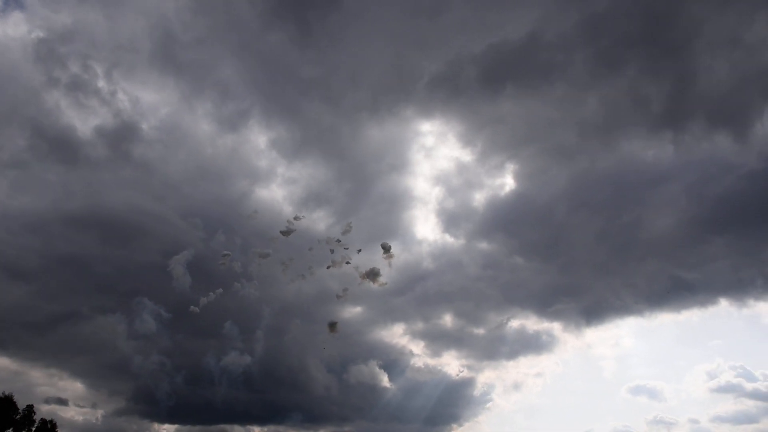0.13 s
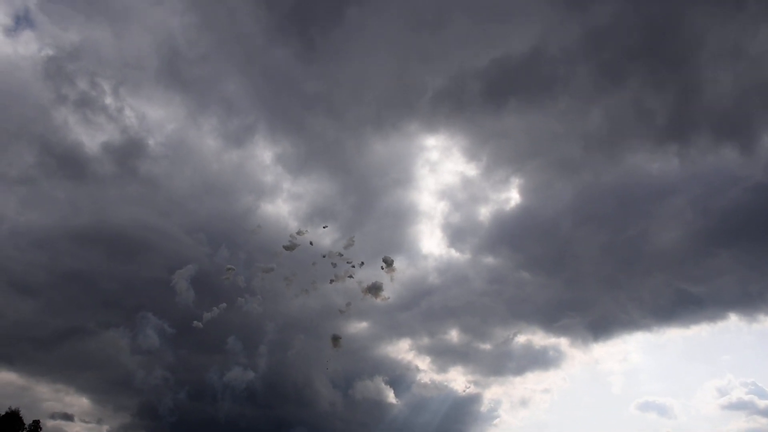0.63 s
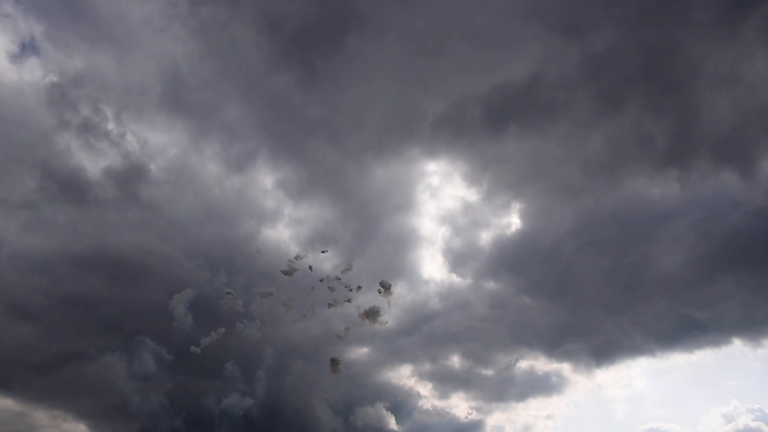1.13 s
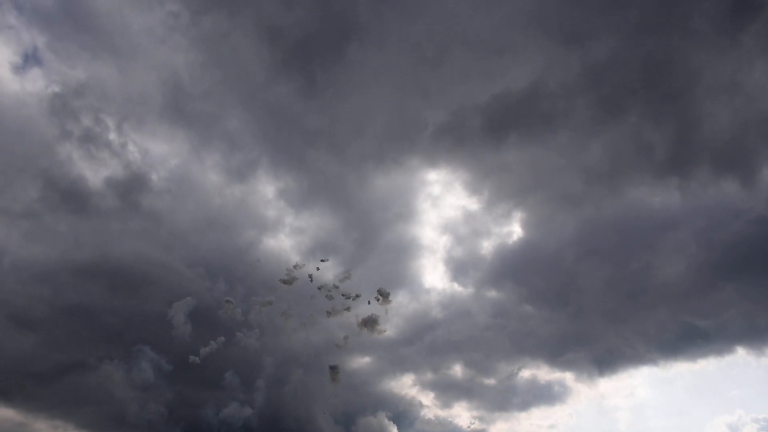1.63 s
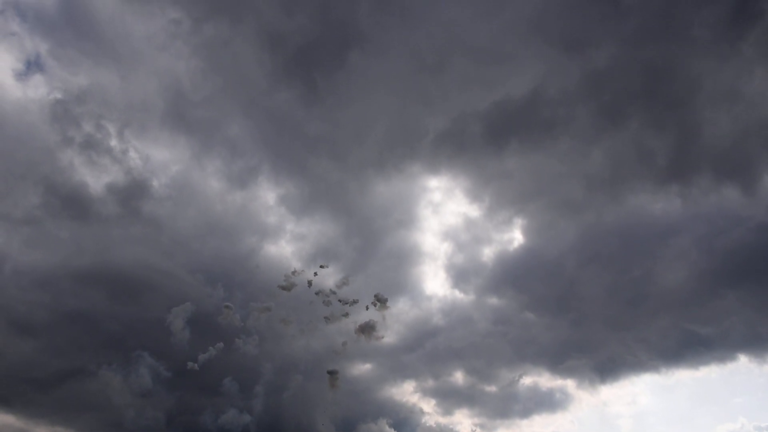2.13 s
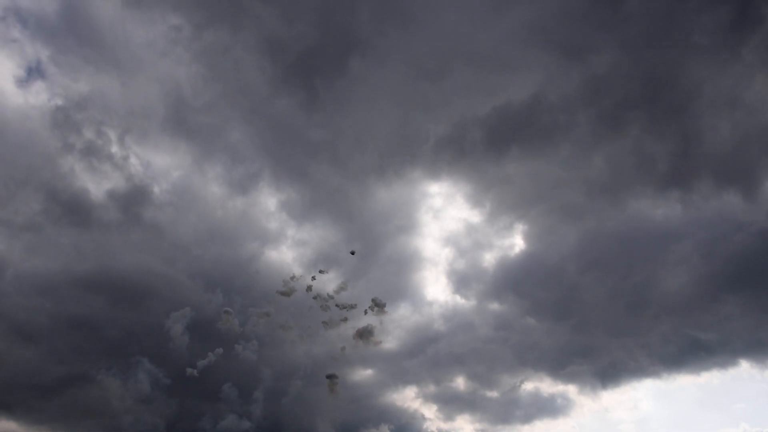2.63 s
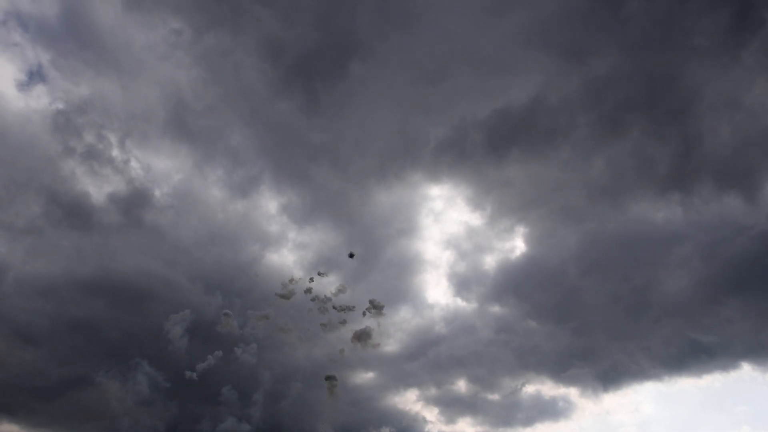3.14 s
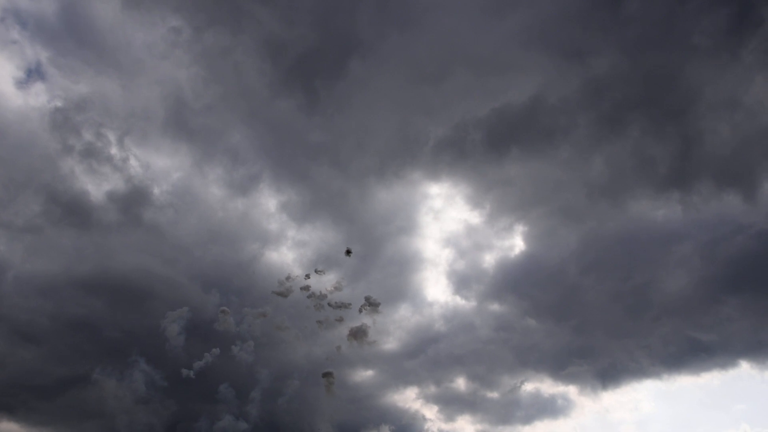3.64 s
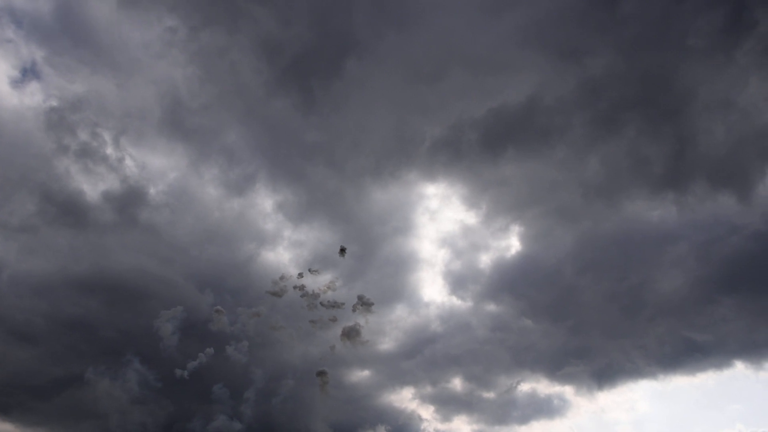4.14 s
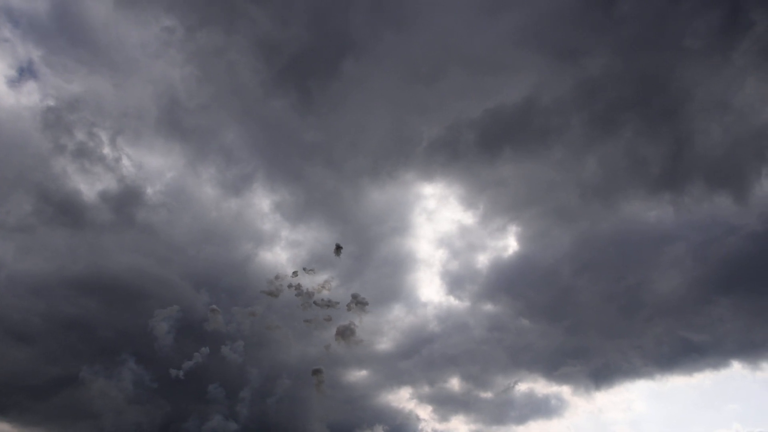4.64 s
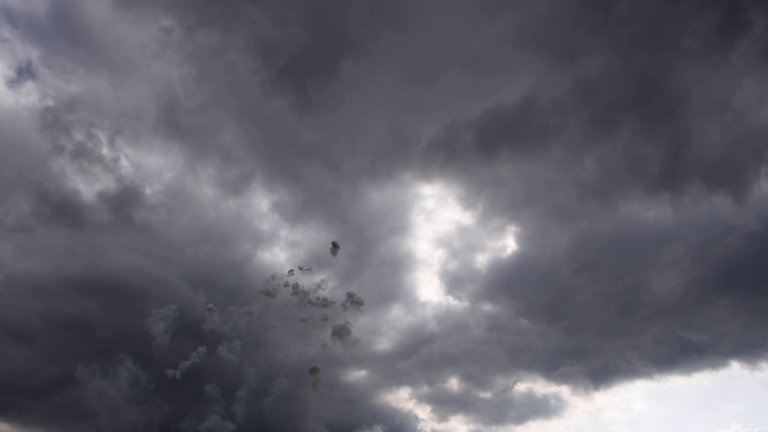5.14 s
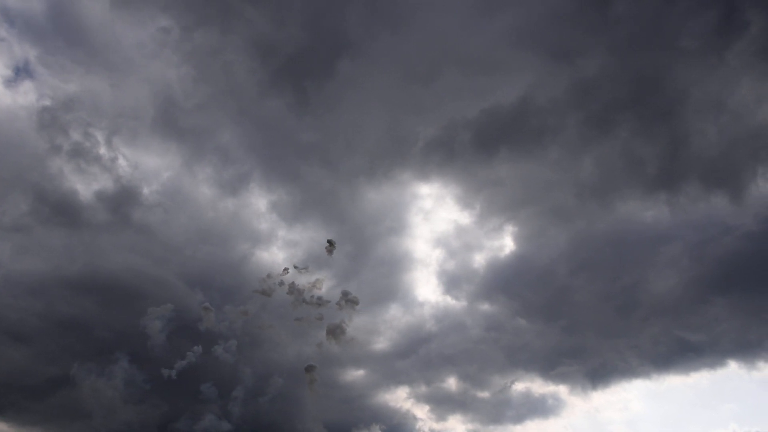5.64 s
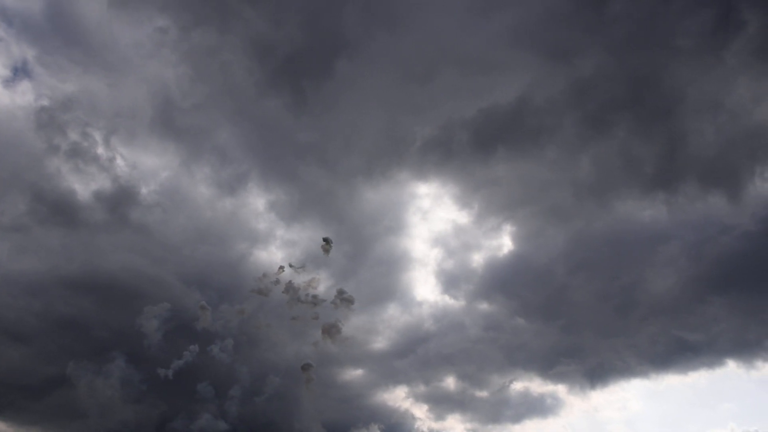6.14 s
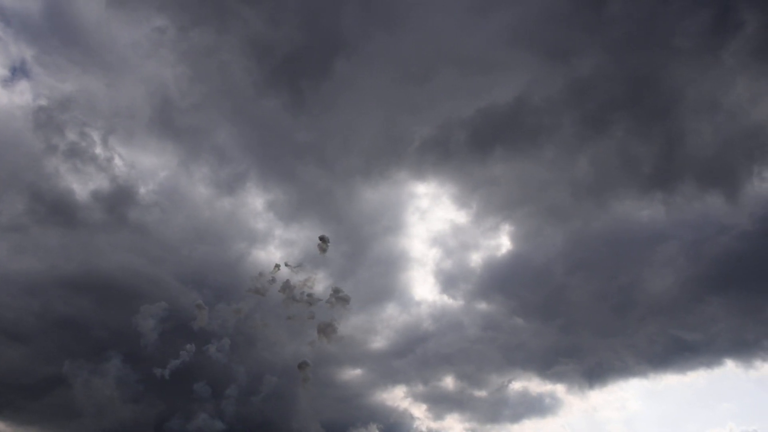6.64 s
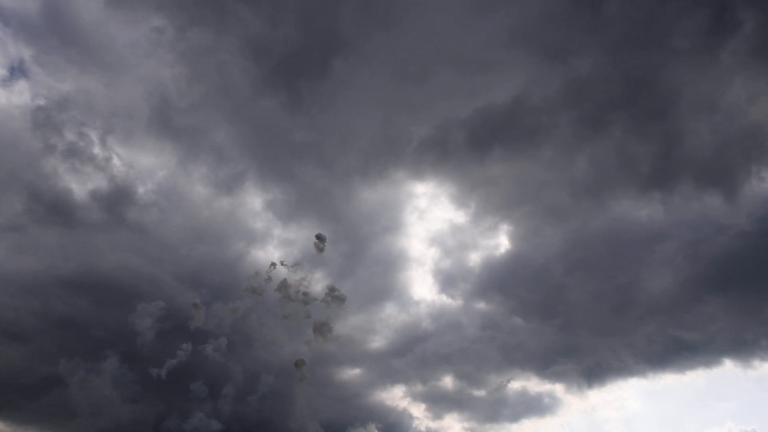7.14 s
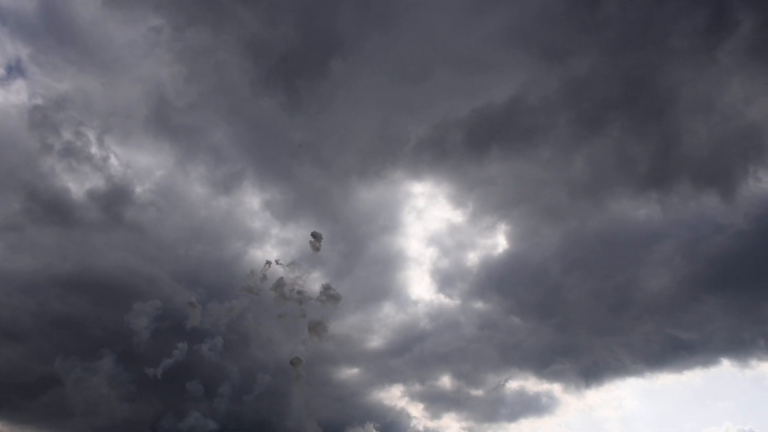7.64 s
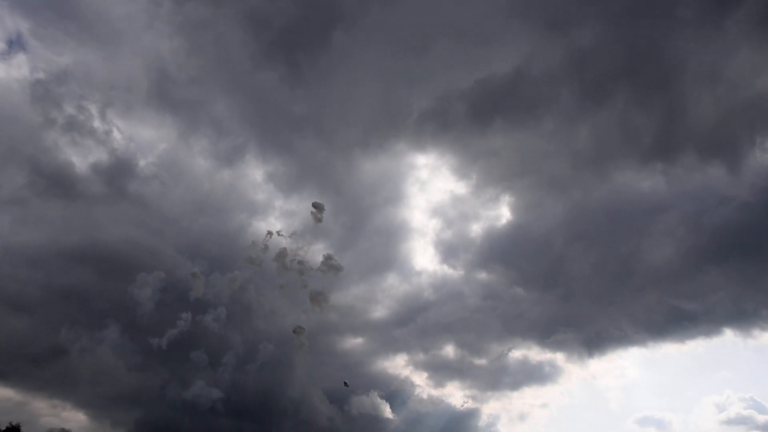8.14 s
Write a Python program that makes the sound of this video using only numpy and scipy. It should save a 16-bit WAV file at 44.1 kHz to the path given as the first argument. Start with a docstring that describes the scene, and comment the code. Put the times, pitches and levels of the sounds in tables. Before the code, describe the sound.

Open ground among trees and houses, with an earlier volley already rolling away and faint far bangs in the first 0.2 s. From 0.24 to 0.3 s five piercing firework cracks stutter together, then one more at 0.5. A huge bang at 1.08 starts another cluster lasting to 1.18, with a single crack at 1.37 and a small bright echo click at 1.44. Five more crack between 2.07 and 2.16. The final, nearly merged double blast comes at 3.28, low to the ground and bassier. All clip harshly and return as thick, lumpy echoes within half a second, with a later slap near 0.9. The roll dulls and sinks from 4 s. Distant thuds at 5.0 and 5.25, a deep one near 6.9, fainter ones to 8.0. Cloth hiss swells around 4-5 and 7.5, with tiny crackles from 5 to 6.4; a ringing pop at 7.8. Light wind, faint hiss.

```python
"""Open ground ringed by tree lines and house fronts: salutes in four quick volleys, three high overhead and the
last near the ground. Each shock is a steep push and suction, repeated off ground and wall, that can overload
the stereo preamp. Shaped noise bursts give each the same chain of echoes; a long noise roll dulls with age.
Smeared echoes of a volley already rolling away open the scene, and smeared far bangs come late; cloth rustling
(swelling hiss, small crackles) and one ringing pop show as the roll fades. Low noise and fluttering gusts make
a little wind on the microphones."""
import sys
import numpy as np
from scipy import signal
from scipy.io import wavfile
from scipy.ndimage import uniform_filter1d

SR = 44100
rng = np.random.default_rng(int(sys.argv[2]) if len(sys.argv) > 2 else 0)


def magnitude_from_level(level_db):
    """Linear magnitude for a level in decibels (20 dB per decade)."""
    exponent = np.asarray(level_db, float) / 20
    return 10 ** exponent


def to_wav(sig):
    """Store sig (one row per channel, or 1-D mono) as 16-bit WAV at the path in sys.argv[1].

    Samples outside -1..1 are clipped; the rate is SR.
    """
    pcm = np.clip(np.atleast_2d(sig), -1, 1) * 32767
    pcm = np.round(pcm).astype(np.int16)
    wavfile.write(sys.argv[1], SR, pcm.T)  # frames by channels


N = 364707

# salutes and, at 1.4421 s, apart from them, a bright click of echo from the bang at 1.077 s:
# t/s, shock level/dB, ground lag/ms, echo level/dB, bearing/0-1
SHOCKS = [(0.236, 21, 1.76, 2.5, 0.7), (0.2561, 20, 1.5, -1.5, 0), (0.2673, 15, 1.8, -8.5, 0.8),
          (0.276, 14.5, 1.7, -3.5, 0.9), (0.3015, 15.5, 1.7, -17, 0.3), (0.502, 13, 1.94, -7.5, 0.1),
          (1.077, 26, 1.62, 0.5, 1), (1.0892, 15, 1.2, -3.5, 0.97), (1.1116, 9.5, 2.1, -5, 0.64),
          (1.1295, 9.5, 1.7, -8, 0.67), (1.176, 14.5, 1.7, -7, 0.6), (1.366, 16.5, 1.83, -6, 0.03),
          (1.4421, -5, 2.16, -13, 0.4), (2.0747, 20.5, 1.7, -6, 0.45), (2.1203, 21, 1.77, 0, 0.9),
          (2.139, 15.5, 1.81, -1.5, 0.9), (2.1491, 15.5, 1.65, -3, 0.96), (2.156, 13.5, 1.66, -6.5, 0.96),
          (3.282, 26.5, 0.64, 3.5, 0.43), (3.2881, 15, 0.62, -2.5, 0.27)]
# smeared far thuds: at the start, echoes of a volley already rolling away; later, bangs far away: # t/s,
# level/dB, tilt/dB per octave, boom/dB, roll level/dB
FAR_THUDS = [(0.0338, -17.5, -0.5, -6, -26), (0.0476, -20, -1.5, -2, -28), (0.1007, -19, 0, -3, -28),
             (0.179, -26.5, 0.5, 0, -31), (5.032, -24, -2, 0, -13), (5.253, -19, -1.5, 0, -23.5),
             (6.8082, -36, 1.5, 1, -25.5), (6.8732, -24, 0.5, 22, -24.5), (6.9106, -34, -1, 0, -25),
             (6.958, -31, 1.5, 0, -36.5), (7.1984, -30, -2, 5, -42), (7.2649, -32, 1.8, 4, -50),
             (7.3423, -29, -2, 0, -43), (8.0305, -35.5, -2.2, -1, -27)]
# spectrum of echoes and roll: f/Hz, relative density/dB per Hz
ECHO_SPECTRUM = [(15, -46.5), (25, -45), (43, -76.5), (74, -5.5), (145, -7.5), (190, 1), (263, -1),
                 (373, -4.5), (531, -1), (624, -6), (734, -2.5), (1040, -5.5), (2760, -17.5),
                 (14400, -44.5), (16000, -61.5)]
# stereo width of echoes and roll: f/Hz, side minus mid/dB
ECHO_WIDTH = [(60, -26), (110, -36), (200, -39), (380, -27), (700, -24), (1290, -19), (2380, -13.5),
              (4400, -10), (8120, -4.5), (15000, 4.5)]
FAR_AGE_S = 0.89  # air path of the far thuds
GRAIN_DB, GRAIN_MS = 2, 2.5  # lumps in the smeared arrivals


def read(table, hz):
    """A (f/Hz, value) table at the given frequencies, interpolated over log frequency."""
    f, value = np.transpose(table)
    return np.interp(np.log(np.maximum(hz, 1)), np.log(f), value)


def tilted(hz, db):
    """A tilt of db per octave about 500 Hz (dB)."""
    return db * np.log2(np.maximum(hz, 20) / 500)


def boom(hz, db):
    """Gain of the lowest octaves (dB), halved at the corner."""
    corner_hz = 79
    return db / (1 + (hz / corner_hz) ** 4)


def air(hz, age_s):
    """Gain after age_s in the air, which takes mostly treble (dB)."""
    # air absorption: f/Hz, loss/dB per s
    air_loss = [(500, 0.61), (2000, -0.1), (4000, 3.5), (6000, 14), (8000, 25.5), (12000, 52), (16000, 54)]
    return -np.outer(read(air_loss, hz), age_s)


def noise(size, colour, width, shape=lambda hz, s: 0 * hz[:, None]):
    """Stereo noise of a colour, mid at rms 1, then shaped by dB over pitch and time."""
    hz, s, z = signal.stft(rng.standard_normal((2, size + 1024)), SR, nperseg=1024)
    gain = magnitude_from_level(read(colour, hz))
    gain /= np.sqrt(np.mean(gain ** 2))
    z = z * gain[:, None] * magnitude_from_level(shape(hz, s))
    z[1] *= magnitude_from_level(read(width, hz))[:, None]
    mid, side = signal.istft(z, SR, nperseg=1024)[1][:, :size]
    return np.array([mid + side, mid - side])


def add(out, s, sound):
    """Mix a short sound in at time s."""
    i = int(s * SR)
    out[:, i:i + sound.shape[1]] += sound[:, :out.shape[1] - i]


def patchy(depth_db, ms):
    """Lumpy random gain: noise smoothed twice over ms, depth_db rms."""
    k = int(ms * SR / 1000)
    walk = uniform_filter1d(uniform_filter1d(rng.standard_normal(N), k), k)
    return magnitude_from_level(depth_db * walk / walk.std())


def swell(t, middle, length):
    """A soft rise and fall around its middle."""
    return np.cos(np.pi * np.clip((t - middle) / length, -.5, .5))


def swells(table, sharp):
    """Gain over time of (middle/s, length/s, level/dB) swells, added as power."""
    t = np.arange(N) / SR
    power = sum((magnitude_from_level(db) * np.abs(swell(t, s, length)) ** sharp) ** 2 for s, length, db in table)
    return np.sqrt(power)


def burst(rise_ms, fall_ms, tilt_db, age_s, boom_db=0.):
    """One smeared arrival: noise with a quick swell, then a fade, dulled by its age in the air."""
    ms = np.arange(int(.35 * SR)) * 1000 / SR

    def shape(hz, s):
        return (tilted(hz, tilt_db) + boom(hz, boom_db))[:, None] + air(hz, age_s + s)
    envelope = (1 - np.exp(-ms / rise_ms)) * np.exp(-ms / fall_ms)
    return noise(len(ms), ECHO_SPECTRUM, ECHO_WIDTH, shape) * envelope


def volley(s, echo_db):
    """Burst height (0-1) and boom (dB) of a shock, from its volley and echo level."""
    # volleys start after: t/s
    volley_starts = [0, 1, 2, 3]
    # per volley: burst height/0-1, boom/dB at echo level 0 dB
    volley_settings = [(0.78, -3.5), (0.87, -8), (0.93, -4.5), (0.01, 9)]
    boom_per_echo_db = -0.46
    height, boom_db = volley_settings[np.searchsorted(volley_starts, s) - 1]
    return height, boom_db + boom_per_echo_db * echo_db


def ring(x, hz, width_hz):
    """One resonance."""
    return signal.lfilter(*signal.iirpeak(hz, hz / width_hz, SR), x)


def wind():
    """Turbulence at each microphone: low rumble and fluttering gusts, with a wide side signal."""
    # gusts: middle/s, length/s, level/dB
    gust_swells = [(0.1, 0.58, -36.5), (1.15, 0.23, -38), (2.0, 0.3, -35), (2.81, 0.14, -25),
                   (4.03, 0.12, -35), (4.25, 0.36, -38), (6.57, 0.51, -44), (7.0, 0.18, -58),
                   (7.4, 0.76, -65), (8.05, .15, -54)]
    # gust spectrum: f/Hz, relative density/dB per Hz
    gust_colour = [(30, -36), (80, -5), (190, 5), (320, -7.5), (500, -14), (900, -46), (3000, -79)]
    # steady wind spectrum: f/Hz, relative density/dB per Hz
    wind_colour = [(20, -18.5), (70, 13), (130, 0), (400, -25), (3000, -82)]
    wind_db, flutter_db, flutter_ms = -57.5, 3, 25
    gusts = noise(N, gust_colour, [(20, 1.5), (400, 1.5)]) * swells(gust_swells, 1.1)
    gusts *= patchy(flutter_db, flutter_ms)
    rumble = magnitude_from_level(wind_db) * noise(N, wind_colour, [(20, -0.5), (400, -1.5)])
    return rumble + gusts


def rustle():
    """Cloth rustling near the microphones: friction noise that swells and flickers, with small crackles."""
    # rustle swells: middle/s, length/s, level/dB
    rustle_swells = [(4.202, 1, -54.5), (4.622, 0.4, -54), (4.9, 0.65, -54), (5.15, .25, -60),
                     (5.503, 0.63, -65), (5.81, 0.21, -63), (6.0, 0.14, -65), (6.2, 0.32, -61),
                     (6.45, .2, -64.5), (7.474, .17, -55.5), (7.603, 0.166, -50), (7.75, .3, -59.5),
                     (7.93, .24, -57.5)]
    # rustle spectrum: f/Hz, relative density/dB per Hz
    rustle_colour = [(1800, -34), (3000, -14), (4400, -4.5), (6000, -7.5), (11000, -13), (14800, -11),
                     (16500, -27)]
    # crackles: t/s, level/dB
    crackles = [(5.077, -40), (5.1883, -34.5), (5.2446, -45.5), (5.262, -39.5), (5.742, -48.5),
                (5.8338, -51), (5.959, -46.5), (5.983, -46), (6.3696, -55)]
    crackle_colour = [(3000, -31), (9000, 4.0), (16000, -2.0)]
    centre = [(3000, -29), (15000, -21.5)]  # f/Hz, side minus mid/dB
    flicker_db, flicker_ms, crackle_fall_s = 2, 25, 0.00084
    out = noise(N, rustle_colour, centre) * swells(rustle_swells, 1.54) * patchy(flicker_db, flicker_ms)
    crackle_fade = np.exp(-np.arange(200) / SR / crackle_fall_s)
    for s, db in crackles:
        add(out, s, magnitude_from_level(db) * noise(200, crackle_colour, centre) * crackle_fade)
    return out


def pop():
    """A small pop close by: a few ms of noise through short resonances, each applied twice."""
    # pops: t/s, level/dB, left minus right/dB
    pops = [(7.8134, -11, 0)]
    # resonances: f/Hz, width of one pass/Hz, gain/dB
    pop_modes = [(842, 420, 6), (1290, 550, 4.5), (1586, 420, 3), (2220, 340, 3.5), (3430, 570, -9.5),
                 (5460, 2200, -19.5)]
    rise_s, fall_s = 0.00068, 0.0036
    out, t = np.zeros((2, N)), np.arange(int(.08 * SR)) / SR
    for s, db, pan_db in pops:
        puff = rng.standard_normal((2, len(t))) * (1 - np.exp(-t / rise_s)) * np.exp(-t / fall_s)
        puff = puff[0] + 0.2 * puff[1] * np.array([[1], [-1]])
        rings = sum(magnitude_from_level(g) * ring(ring(puff, f, w), f, w) for f, w, g in pop_modes)
        side_db = np.array([[pan_db], [-pan_db]]) / 2
        add(out, s, rings / np.abs(rings).max() * magnitude_from_level(db + 1.0 + side_db))
    return out


def far_thuds():
    """Dull thuds, already smeared and stripped of treble on the way."""
    rise_ms, fall_ms = 0.9, 14.7
    out = np.zeros((2, N))
    for s, db, tilt, boom_db, _ in FAR_THUDS:
        add(out, s, magnitude_from_level(db) * burst(rise_ms, fall_ms, tilt, FAR_AGE_S, boom_db))
    return out * patchy(GRAIN_DB, GRAIN_MS)


def roll():
    """Landscape scatter: the rolls of all shocks add as power, each fading and dulling with its own age."""
    # scattered roll after a shock: delay/s, level/dB
    roll_fade = [(0, -19), (.06, -21.5), (.1, -20.5), (.8, -21), (1.3, -26), (1.7, -32.5), (1.87, -30),
                 (2.7, -42), (3.3, -41.5), (5, -52), (7, -100)]
    # a volley already rolling away: t/s, echo level/dB
    earlier_volley = (-1.45, 1)
    patch_db, patch_ms = 1, 30
    # t/s, level/dB, boom/dB, tilt/dB per octave, earlier air path/s
    starts = [(*earlier_volley, 0, 0, 0)]
    starts += [(s, db, volley(s, db)[1], 0, 0) for s, *_, db, _ in SHOCKS]
    starts += [(s, db, 0, tilt, FAR_AGE_S) for s, _, tilt, _, db in FAR_THUDS]

    def shape(hz, t):
        power = 0
        for s, db, boom_db, tilt, path_s in starts:
            fade = db + np.interp(t - s, *np.transpose(roll_fade), left=-200)
            colour = boom(hz, boom_db) + tilted(hz, tilt)
            loss = air(hz, np.maximum(t - s, 0) + path_s)
            power = power + magnitude_from_level(2 * (fade + colour[:, None] + loss))
        return 10 * np.log10(power)
    return noise(N, ECHO_SPECTRUM, ECHO_WIDTH, shape) * patchy(patch_db, patch_ms)


def echoes():
    """Every shock comes back off the same surfaces; a higher burst arrives later and softer edged."""
    # surfaces: delay/s, extra delay at full height/s, level/dB, rise at zero height/ms, fall/ms,
    # tilt/dB per octave, gain at full bearing/dB
    reflectors = [(.077, 0.04, -10.5, 0.64, 81, -0.5, -4.5), (0.103, 0.039, 0, 3.4, 56, -0.82, -8.5),
                  (0.152, 0.024, -11.5, 4, 37, -2, 0.5), (.284, 0.022, -6.5, 11, 23, 1.3, -10.5),
                  (.362, .009, -4, 1.06, 16.4, 0.73, -2), (0.88, 0.022, -17.5, 0.54, 4.6, 4, 8.5),
                  (.884, 0.014, -15.5, 8.5, 26.6, -2, 18)]
    out = np.zeros((2, N))
    for s, *_, echo_db, bearing in SHOCKS:
        height, boom_db = volley(s, echo_db)
        for delay, more, db, rise, fall, tilt, facing_db in reflectors:
            age_s = delay + more * height
            arrival = burst(rise * (1 + 4.55 * height), fall, tilt, age_s, boom_db)
            add(out, s + age_s, magnitude_from_level(db + echo_db + facing_db * bearing) * arrival)
    return out * patchy(GRAIN_DB, GRAIN_MS)


def shocks():
    """Steep push then suction, again and blunter off the ground and a wall, with scatter from things nearby."""
    push_ms, push_ms_per_db = 0.3, 0.04  # a stronger shock pushes longer
    scatter_db, scatter_ms = -9.5, 3.16
    thump_hz, thump_ms, thump_db = 209, 9.4, -14.5
    arrivals = [(1, .03), (1, .05), (0.57, .09)]  # direct, ground, wall: gain, edge/ms
    out, ms = np.zeros((2, N)), np.arange(int(.06 * SR)) * 1000 / SR - .7
    after_ms = np.maximum(ms, 0)
    for s, db, lag_ms, *_ in SHOCKS:
        length_ms = push_ms + push_ms_per_db * db
        scatter = burst(0.83, scatter_ms, -0.83, 0.)[:, :len(ms)] * (ms > 0)
        # the scatter comes from much the same side as the shock
        wave = magnitude_from_level(scatter_db) * (0.45 * scatter + 0.77 * scatter.mean(axis=0))
        for k, (gain, edge_ms) in enumerate(arrivals):
            # each arrival has its own direction, so it reaches one microphone first
            skew_ms = 0.0023 * rng.standard_normal() * np.array([[1], [-1]])
            t = ms - k * lag_ms + skew_ms
            fade = np.exp(-np.abs(t) / (0.65 * length_ms))
            wave += gain * np.clip(t / edge_ms, 0, 1) * (1 - t / length_ms) * fade
        # the hot gas overshoots and the air swings back once or twice
        swing = np.sin(2 * np.pi * thump_hz * after_ms / 1000) * np.exp(-after_ms / thump_ms)
        wave -= magnitude_from_level(thump_db) * swing
        add(out, s, magnitude_from_level(db) * wave)
    # the small capsule swings past rest after each step
    return signal.sosfilt(signal.cheby1(2, 3., 260., "high", fs=SR, output="sos"), out)


def scene():
    """All layers, background first."""
    return wind() + rustle() + pop() + far_thuds() + roll() + echoes() + shocks()


def low_pass(x):
    """Removes everything above the highest recorded frequency."""
    return signal.sosfilt(signal.butter(12, 16640, fs=SR, output="sos"), x)


def record(dry):
    """A bass cut, then a preamp that hisses faintly and clips flat at full scale."""
    hiss_db = -66
    hiss_colour = [(2000, 6.5), (4000, 5), (6000, 3), (15000, -3), (16500, -20)]  # f/Hz, dB per Hz
    cut = signal.sosfilt(signal.butter(3, 50., "high", fs=SR, output="sos"), dry)
    hiss = magnitude_from_level(hiss_db) * noise(N, hiss_colour, [(2000, -5), (15000, -4.5)])
    mix = np.clip(cut + hiss, -1, 1)
    return low_pass(mix)


dry = scene()
out = record(dry)
to_wav(out)
```